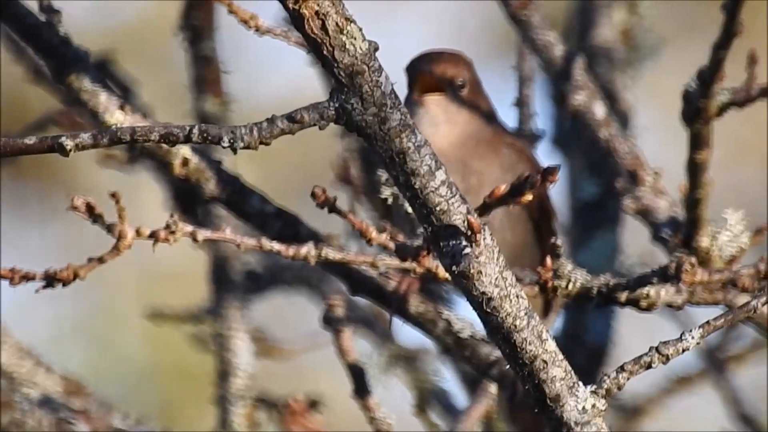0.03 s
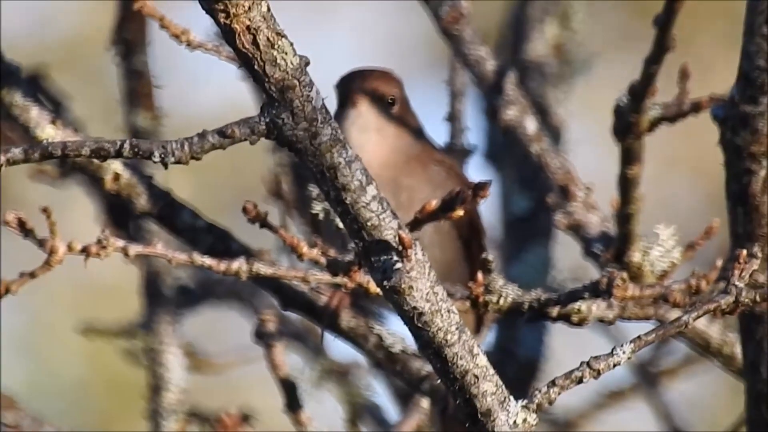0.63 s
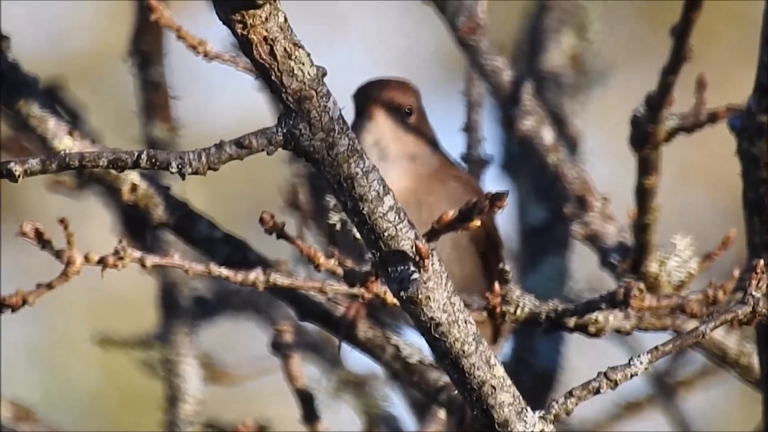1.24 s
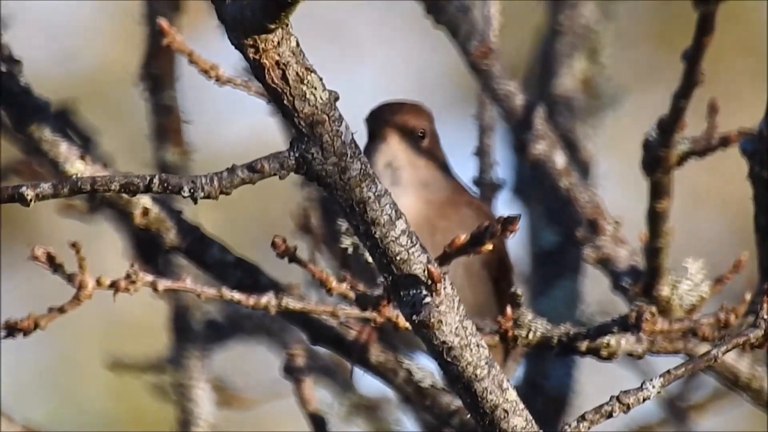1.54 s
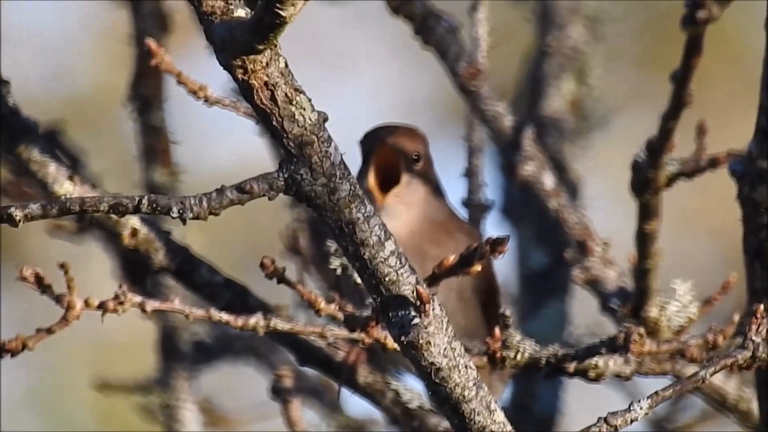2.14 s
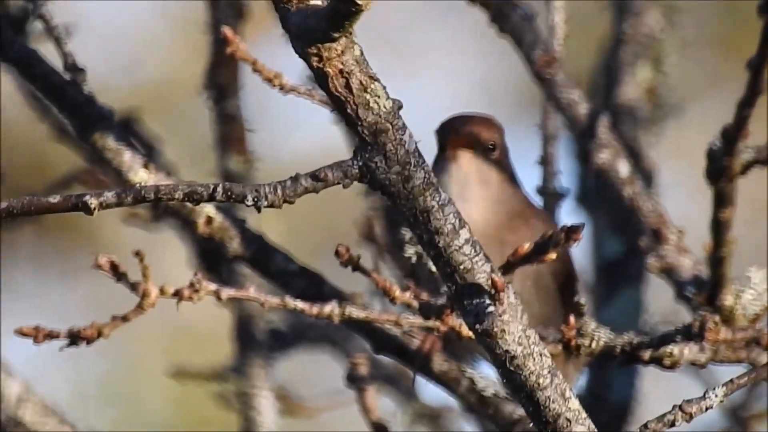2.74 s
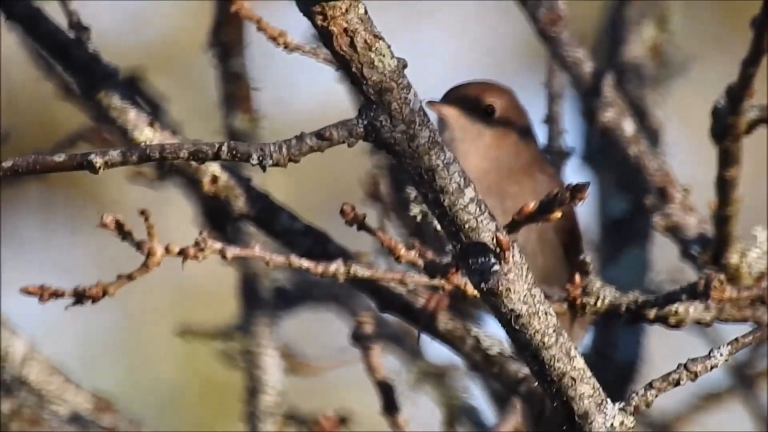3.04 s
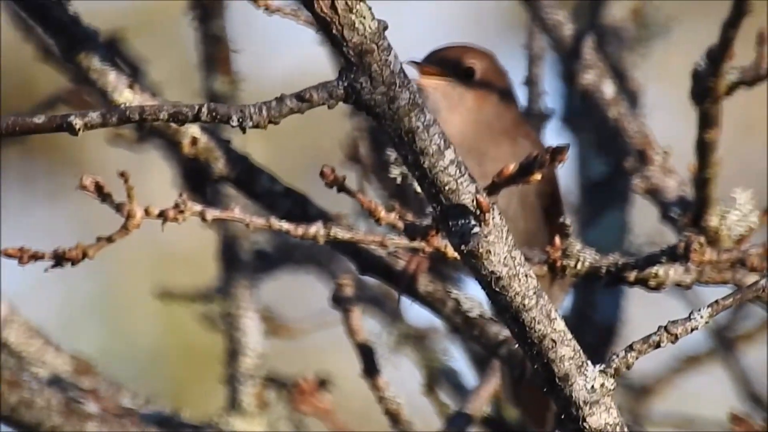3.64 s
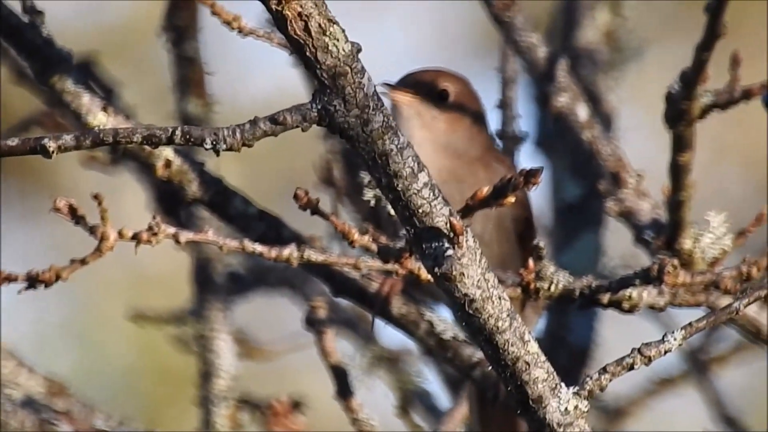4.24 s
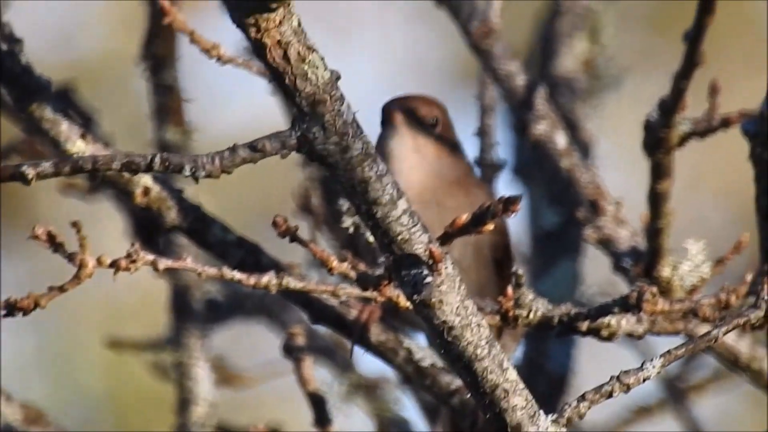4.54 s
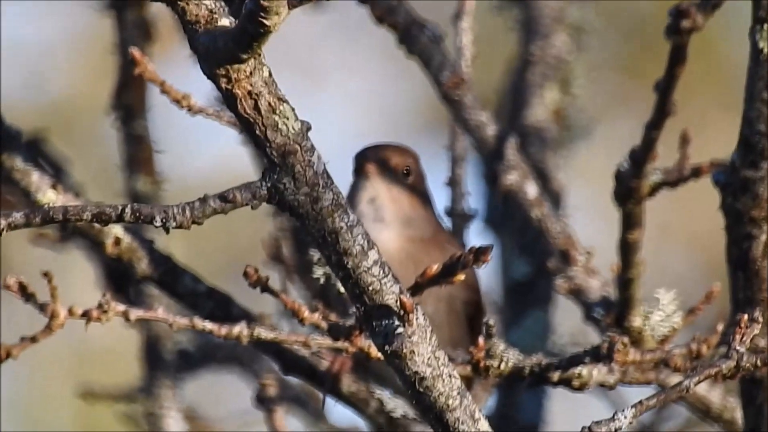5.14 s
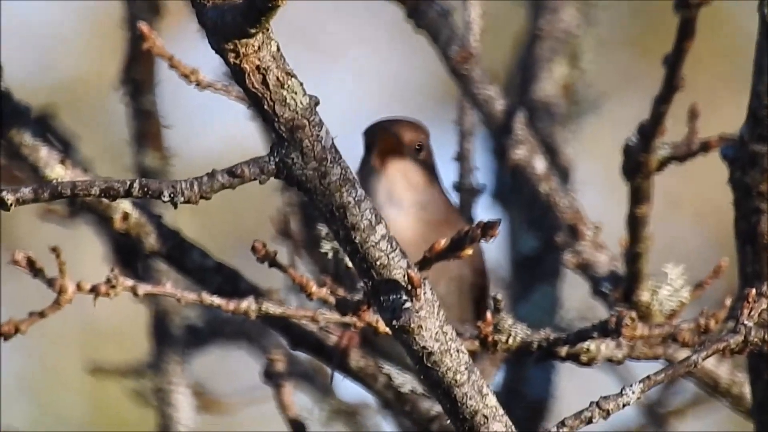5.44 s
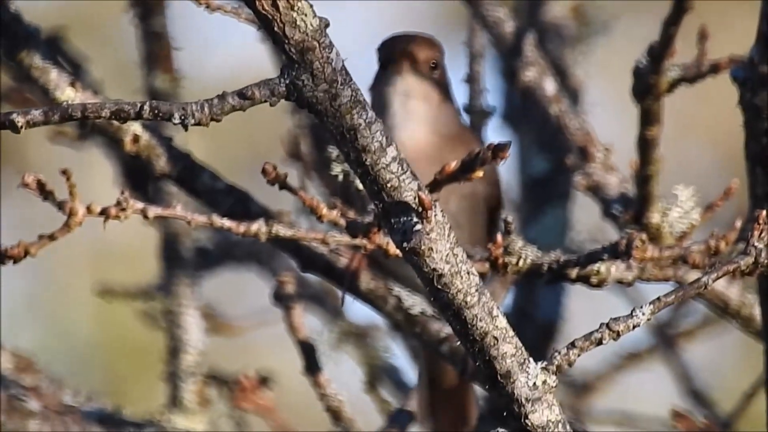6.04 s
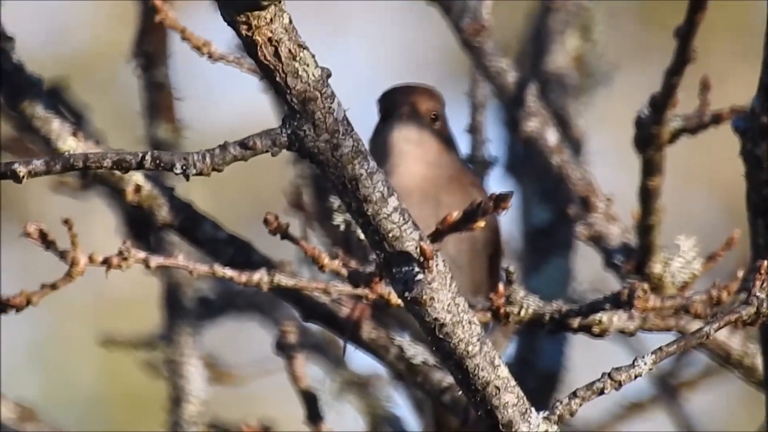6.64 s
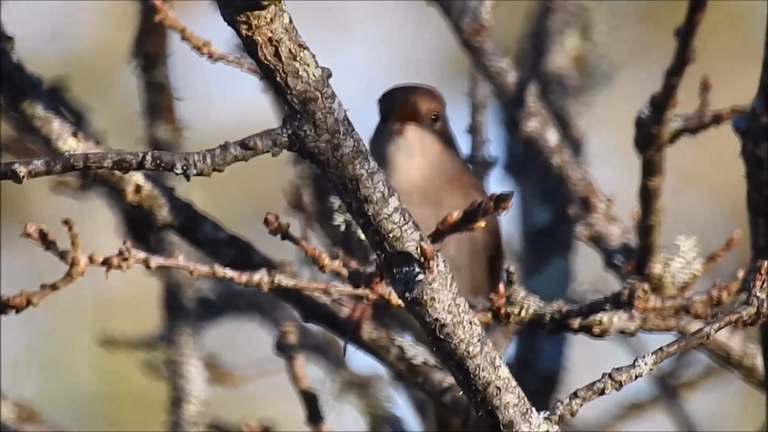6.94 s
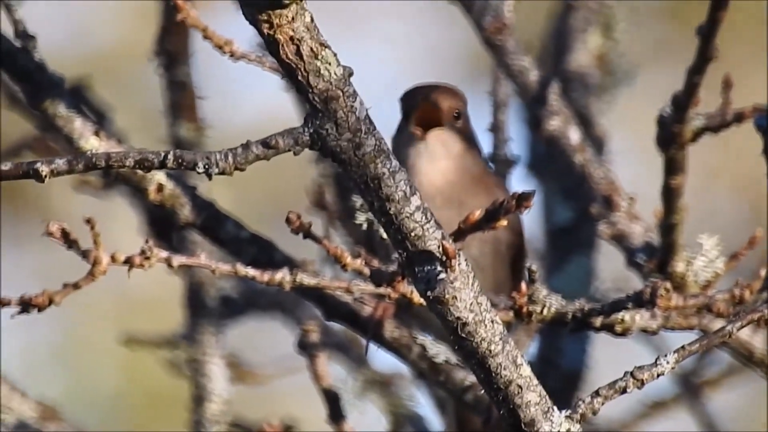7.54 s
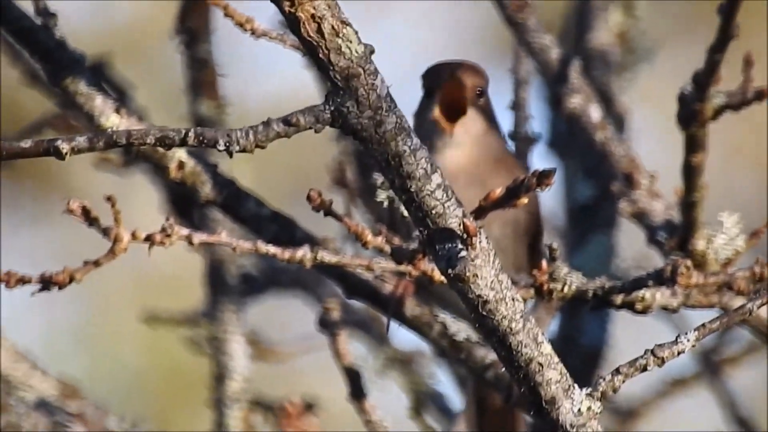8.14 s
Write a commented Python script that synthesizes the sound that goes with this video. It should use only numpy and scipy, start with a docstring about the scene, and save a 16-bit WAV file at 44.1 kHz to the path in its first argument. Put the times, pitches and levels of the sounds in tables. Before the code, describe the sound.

A nightingale sings close by in a bare tree. A few quick slurred notes lead into a hard, fast rattle. After a lull with one thin, high whistle come clicks, sharp slides and two sets of three loud falling notes. Another bird adds buzzy trills, while distant birds chirp over a soft, low hush. The song sits just right of centre, with a light woodland echo.

```python
"""A nightingale sings from a bare tree: thin whistles, slurs, a hard rattle, clicks and falling notes. Its
voice box, the syrinx, makes each note as a nearly pure tone that slides to a turning point; then pitch and
loudness relax together. Some runs of repeated notes slow down as they go. Branches and trunks scatter the song.
Another bird buzzes close by; others whistle farther off, and something hoots, over a brief rustle and a soft
outdoor hush."""
import sys
import numpy as np
from scipy import signal
from scipy.fft import rfft, irfft, next_fast_len
from scipy.io import wavfile
from scipy.ndimage import uniform_filter1d

SR = 44100
rng = np.random.default_rng(int(sys.argv[2]) if len(sys.argv) > 2 else 0)


def wrap_up_sound(samples):
    """Save the sound to the file named by the first command line argument, as 16-bit audio."""
    columns = np.atleast_2d(samples).T
    # keep every value between -1 and 1, then stretch to whole-number steps
    tamed = np.clip(columns, -1, 1)
    steps = np.round(tamed * 32767).astype(np.int16)
    wavfile.write(sys.argv[1], SR, steps)


N = 365588
CUTOFF_HZ = 15500   # the top of the treble

# The nightingale's single notes: (time [s], note name, level [dB], optional pitch and length factors)
SINGLE_NOTES = [ (.771, "flick", -17), (1.594, "zip", -12.5, 1, .8), (1.6025, "tiu", -14.5),
                (4.965, "arch", -14.5), (5.427, "zigzag", -7.5), (5.56, "rise", -13.5),
                (5.609, "drop", -17), (5.985, "warble", -22.5), (6.499, "wheet", -7), (7.428, "lift", -21),
                (7.482, "chow", -13.5), (7.618, "zip", -14, 1.08, 1.2), (7.631, "squeal", -21),
                (7.803, "hook", -20), ]


def nightingale():
    """The whole song. The syrinx has two sides, so a second voice can lead into a note."""
    notes = SINGLE_NOTES + runs()
    out = sing(notes) + rattle() + clicks() + whistles()
    arch = np.hanning(int(.04 * SR))
    for s, name, db, *_ in notes:
        if name == "wheet":
            scrape = rasp(count=2, gap_s=.008, stretch=1.25, fade_db=7, hiss_db=-15)
            thin_rise = arch * syrinx(np.geomspace(7500, 8500, len(arch)), db - 20, rough=.01)
            add(out, s - .0205, from_db(db - 1) * scrape)
            add(out, s - .012, thin_rise)
        if name in ("pew", "tiu"):
            add(out, s - .008, from_db(db - 28) * squeak())
    return out


def syrinx(hz, db, rough, beak_hz=6900):
    """A bird's voice: a slightly shaky tone. The beak muffles its overtones; rough notes hiss more."""
    size = len(hz)
    noise = band(uniform_filter1d(rng.standard_normal(size), size=2), beak_hz / 2, CUTOFF_HZ)
    breath = from_db(35) * (rough * hz / beak_hz) ** 2 * noise
    hz = hz * (1 + rough * drift(size, 1504))
    phase = 2 * np.pi * np.cumsum(hz) / SR
    overtones = sum(np.sin(k * phase) / (k - 1) ** 2 / (1 + (k * hz / beak_hz) ** 4)
                    * (k * hz < CUTOFF_HZ) for k in (2, 3))
    brightness = from_db(-26.5) + rough / 2
    t = np.arange(size) / SR
    soft_ends = np.minimum(1, np.minimum(t, t[::-1]) / .00095)
    return from_db(db) * soft_ends * (np.sin(phase) + brightness * overtones + breath)


# How each kind of note slides, before it is retuned or stretched. Name: (length [ms], turn time [ms],
# start pitch [Hz], turn pitch [Hz], resting pitch [Hz], time to relax [ms], fade-in [ms], fade [dB])
NOTE_SHAPES = { "flick": (39.7, 30, 4130, 8000, 1300, 7.6, 23.7, 40),
               "slur": (35, 7, 4500, 4810, 3830, 18, 9.4, 16),
               "tick": (28.8, 22, 1300, 3000, 1960, 6, 26.4, 9.6),
               "tiu": (71, 19, 4800, 2520, 3250, 45, 1.4, 8.5),
               "low": (43.5, 5.8, 2750, 2450, 1920, 19.2, 4.2, 12.7),
               "swell": (11.5, 3.1, 4050, 4350, 5050, 5.4, 2.6, 6.5),
               "pip": (16, 10.2, 1600, 3100, 2200, 3.2, 10, 17),
               "zip": (10.9, 3.99, 4100, 5100, 7950, 6.6, 3.6, 13),
               "arch": (86, 29.6, 3010, 4720, 3450, 18, 37, 9.3),
               "zigzag": (68, 14, 5600, 5470, 5900, 42, 3, 15),
               "rise": (49.5, 15.5, 1843, 2483, 3498, 26.5, 22, -1),
               "drop": (7.63, 2, 3700, 3470, 1450, 4.65, 1.7, 20.7),
               "warble": (75, 50, 1650, 2020, 2100, 16.3, 36, 20),
               "chew": (32, 6.5, 4750, 4500, 2450, 9, 3.5, 10.8),
               "chow": (26.3, 9, 4450, 3150, 1485, 11.4, 7, 27.8),
               "wheet": (26.6, 14, 4350, 5950, 6750, 8.3, 5.2, 10),
               "lift": (42, 9.1, 3000, 3500, 4100, 21, 4.6, 11),
               "squeal": (106, 62, 7480, 5920, 5500, 38, 7.3, 5),
               "hook": (61.3, 44, 1400, 2450, 1200, 7.4, 47, 33),
               "pew": (40, 4.6, 8300, 6200, 2760, 6, 4.2, 17.3),
               "chip": (76, 13, 6300, 4060, 4200, 55.4, 14, 9),
               "pipe": (117, 35.3, 3300, 3440, 3520, 47, 10, 5), }
# Notes whose pitch swings quickly up and down.
# Name: (swings [per s], full swing [share of pitch], drop at each low point [dB], extra roughness [0-1])
PITCH_SWINGS = {"zigzag": (69.5, 0.67, 25, 0.02), "warble": (135, 0.26, 5.9, .005),
                "squeal": (170, .13, 18, .005), "chip": (200, 0.075, 5, 0.012)}


def note(name, pitch=1, stretch=1, rough=.0054, beak_top_hz=7120):
    """One note: the pitch slides to a turn, then relaxes and takes the loudness with it."""
    length, turn, start_hz, turn_hz, rest_hz, relax, fade_in, fade_db = NOTE_SHAPES[name]
    swing_rate, depth, drop_db, extra_rough = PITCH_SWINGS.get(name, (0, 0, 0, 0))
    t = np.arange(int(length * stretch * SR / 1000)) / SR
    ms = 1000 * t / stretch   # position within the unstretched shape
    slide_hz = start_hz * (turn_hz / start_hz) ** np.minimum(ms / turn, 1)
    relaxed = 1 - np.exp(-(np.maximum(ms - turn, 0) / relax) ** 1.363)
    swing = .5 * np.cos(2 * np.pi * swing_rate * t)
    hz = pitch * (slide_hz + (rest_hz - turn_hz) * relaxed) * (1 + depth * swing)
    db = -fade_db * relaxed ** 2.02 - drop_db * (.5 - swing) ** 2
    opening = np.minimum(ms / fade_in, 1) ** 1.14
    closing = np.minimum((length - ms) / (.099 * length), 1)
    beak = 1 / (1 + (hz / beak_top_hz) ** 20.4)   # very high notes come out weaker
    return opening * closing * beak * syrinx(hz, db, rough + extra_rough)


def sing(rows):
    """Place each note of a list at its own time and level."""
    out = np.zeros(N)
    for s, name, db, *pitch_and_stretch in rows:
        add(out, s, from_db(db) * note(name, *pitch_and_stretch))
    return out


# The nightingale's runs of one note: (start [s], count, first gap [s], gap factor per note, note name,
# first level [dB], level step [dB], first pitch factor, pitch factor step)
NOTE_RUNS = [ (1.162, 3, 0.037, 1.08, "slur", -26.5, 7, 0.92, 0.054),
             (1.3958, 3, .049, 1.1, "pip", -22, -0.5, 1, 0.0025),
             (1.74, 2, 0.049, 1, "low", -32, 15.5, .77, 0.24), (6.1122, 3, .1225, 1, "chew", -6, 0, 1, 0),
             (6.1542, 3, .1225, 1, "chow", -11, 0, 1, 0), (7.9512, 3, .118, 1.042, "pew", -8, .8, 1, 0), ]


def runs():
    """List the notes of each run; gap, level and pitch can move one step with every note."""
    notes = []
    for start, count, gap, slowing, name, db, step_db, pitch, pitch_step in NOTE_RUNS:
        for k in range(round(count)):
            s = start + gap * sum(slowing ** j for j in range(k))
            notes.append((s, name, db + step_db * k, pitch + pitch_step * k))
    return notes


def rattle(start_s=1.8928, count=12, gap_s=.08494, first_db=-10.5, last_db=-9):
    """Hard strokes that grow louder: each is a rasp and a faint upward slide, a clear note, a drop."""
    out = np.zeros(N)
    gaps = gap_s + .0019 * np.linspace(-1, 1, count - 1) ** 2   # a little slower at both ends
    times = start_s + np.r_[0, np.cumsum(gaps)]
    for s, db in zip(times, np.linspace(first_db, last_db, count)):
        clear_pitch, drop_pitch = 1 + rng.normal(0, .012, size=2)
        add(out, s, from_db(db - .1) * rasp(count=4, gap_s=.0044, stretch=.97, fade_db=1.1, hiss_db=-13))
        add(out, s, from_db(db - 19) * note("tick", pitch=1.27, rough=.026))
        add(out, s + .0215, from_db(db) * note("swell", clear_pitch, rough=.019))
        add(out, s + .032, from_db(db - 2) * note("drop", 1.39 * drop_pitch, stretch=1.15, rough=.026))
    return out


def rasp(count, gap_s, stretch, fade_db, hiss_db, rough=.03, uneven=.15):
    """One side of the syrinx fires quick, uneven upward slides that get lower and louder, with hiss."""
    out = np.zeros(SR // 10)
    for k, (late, sharp, strong) in enumerate(rng.standard_normal((count, 3))):
        to_come = count - 1 - k
        slide = note("zip", 1 + .0692 * to_come + rough * sharp, stretch, rough)
        strength = from_db(-fade_db * to_come ** 2) * (1 + uneven * strong)
        add(out, (k + uneven * late) * gap_s, strength * slide)
    add(out, 0, from_db(hiss_db) * puff((count + 1) * gap_s, low_hz=4900, high_hz=6950, order=2))
    return out


# The nightingale's bursts of clicks: (time [s], level [dB])
CLICK_BURSTS = [(4.403, -35.5), (5.681, -20.5), (5.73, -18), (5.784, -15.5), (5.833, -16), (5.887, -16)]


def clicks(gap_s=.0061, fade_db=2):
    """Bursts of four dry, noisy clicks, each weaker than the last."""
    out = np.zeros(N)
    for s, db in CLICK_BURSTS:
        for k in range(4):
            click = puff(length_s=.0029, low_hz=6000, high_hz=6900)
            add(out, s + k * gap_s, from_db(db - fade_db * k) * click)
    return band(out + 1e-18, low_hz=2600, high_hz=6700)


def puff(length_s, low_hz, high_hz, order=1):
    """A burst of hiss that swells and dies."""
    arch = np.hanning(int(length_s * SR))
    return arch * rms_one(band(rng.standard_normal(len(arch)), low_hz, high_hz, order))


# The nightingale's long, thin whistles: (time [s], level [dB])
THIN_WHISTLES = [(-.335, -37.5), (3.69, -38.5)]


def whistles(length_s=.576, held_hz=7540, settle_s=.039, droop_s=.0066, swell_db=9, soft_db=25):
    """Each whistle slides down to a high, held pitch, swells, and droops as it stops."""
    out = np.zeros(N)
    t = np.arange(0, length_s, 1 / SR)
    arriving, leaving = np.exp(-t / settle_s), np.exp((t - length_s) / droop_s)
    hz = held_hz + 1600 * arriving - 500 * leaving
    shape_db = swell_db * (t / length_s - 1) - soft_db * (arriving + leaving)
    for s, db in THIN_WHISTLES:
        add(out, s, syrinx(hz, db + shape_db, rough=.0063))
    return out


def squeak(length_s=.018, top_hz=13600, plunge_hz=5500, plunge_s=.0024):
    """A very high, thin voice that swells, then plunges into the main note."""
    t = np.arange(0, length_s, 1 / SR)
    hz = top_hz - plunge_hz * np.exp((t - length_s) / plunge_s)
    swell = np.sin(np.pi * (t / length_s) ** 2)
    return swell * syrinx(hz, db=0, rough=.007)


# A nearby bird's strings of buzzy notes:
# (middle of first note [s], count, fast gap [s], slow gap [s], first level [dB], last level [dB])
BUZZY_TRILLS = [(1.494, 9, 0.0445, .049, -29, -28.5), (6.634, 14, .0428, .083, -29.5, -24.5)]


def buzzing_bird(flutter_hz=340, slows_at_note=7.8, slows_over_notes=.76):
    """Arched, fluttering notes. As the pace slows they last longer, sit higher and swing wider."""
    out = np.zeros(N)
    for start, count, fast_gap, slow_gap, first_db, last_db in BUZZY_TRILLS:
        count = round(count)
        slowed = 1 / (1 + np.exp((slows_at_note - np.arange(count - 1)) / slows_over_notes))
        middles = np.r_[0, np.cumsum(fast_gap + (slow_gap - fast_gap) * slowed)]
        lengths = .6 * np.gradient(middles)   # a note fills 60% of its turn
        for s, length, db in zip(start + middles, lengths, np.linspace(first_db, last_db, count)):
            t = np.arange(0, length, 1 / SR)
            edge = np.linspace(-1, 1, len(t)) ** 2   # both ends are lower and softer
            flutter = np.sin(2 * np.pi * flutter_hz * t)
            hz = (3600 + 38000 * length) * (1 - .17 * edge + 3.3 * length * flutter)
            add(out, s - length / 2, syrinx(hz, db - 13 * edge - 3 * (1 + flutter), rough=.017))
    return out


# Calls from other trees: (time [s], note name, level [dB], pitch factor, length factor)
FAR_CALLS = [ (.11, "swell", -46, .73, 9), (.505, "chow", -41, .85, 1.1), (.672, "pip", -39, 1.05, 1.1),
             (4.632, "low", -36, 0.82, 0.55), (4.79, "warble", -33.5, 1.48, 0.9),
             (5.725, "pipe", -38, 1.07, 0.92), (5.897, "slur", -32, 0.73, 1.8),
             (6.06, "pipe", -33, 0.845, 0.75), (6.575, "slur", -29.5, 0.83, 1.7),
             (6.775, "slur", -34, .69, 1.4), (6.857, "pipe", -37, .585, .5), (6.99, "slur", -31, .615, 2.7),
             (7.188, "slur", -35, .78, 2), (7.263, "lift", -31, .9, .8), (7.36, "swell", -32, .6, 13), ]
# Calls said over and over: (start [s], end [s], gap [s], note name, level [dB], pitch and length factors)
FAR_REPEATS = [ (.005, 1.1, .207, "low", -44, .88, 0.82), (3.054, 4.3, 0.5, "pipe", -41.5, 1.005, 1),
               (3.276, 4, 0.503, "chip", -31, 0.98, 1), (5.169, 5.35, 0.0272, "chow", -36, 0.62, 0.33),
               (4.258, 4.65, .101, "tick", -41.5, 1.04, 1.94), (7.096, 7.16, .026, "zip", -27, 1.05, .5), ]


def far_birds():
    """Distant birds sing single notes or repeat one note at a steady pace."""
    repeated = [(s, *call) for start, end, gap, *call in FAR_REPEATS for s in np.arange(start, end, gap)]
    return sing(FAR_CALLS) + sing(repeated)


# Something hooting far off: (time [s], level [dB])
FAR_HOOTS = [(.055, -37), (.825, -38)]


def hoots(pitch_hz=560, length_s=.08):
    """Short, hoarse tones that swell and fade."""
    out, arch = np.zeros(N), np.hanning(int(length_s * SR))
    for s, db in FAR_HOOTS:
        add(out, s, syrinx(np.full(len(arch), pitch_hz), db - 8 * (1 - arch), rough=.09))
    return out


def chorus(count=170, level_db=-48, lowest=.62, highest=1.7):
    """Faint chirps from all over the wood, at random times and pitches."""
    shapes = ["low", "tick", "hook", "lift", "warble"]
    return sing([(when * N / SR, shapes[k % len(shapes)], level_db, lowest * (highest / lowest) ** height)
                 for k, (when, height) in enumerate(rng.random((count, 2)))])


def tree_echo(sound, twigs_db, trunks_db, trunks_s, twigs_s=.17, low_hz=1200, high_hz=7100):
    """Branches scatter sound quickly and trunks answer for longer, differently for each ear."""
    t = np.arange(int(.8 * SR)) / SR
    onset = np.clip((t - .002) / .0022, 0, 1)
    echo = 0
    for db, fade_s in [(twigs_db, twigs_s), (trunks_db, trunks_s)]:
        bounces = rng.standard_normal((3, len(t))) * from_db(5.7 * rng.standard_normal((3, len(t))))
        both_ears = bounces[:2] + 1.04 * bounces[2]   # each ear's own bounces plus shared ones
        tail = both_ears * from_db(-60 * t / fade_s) * onset
        echo = echo + from_db(db) * tail / np.sqrt(np.sum(tail ** 2) / 2)
    echo = band(echo, low_hz, high_hz, order=3) + from_db(-15.5) * band(echo, high_hz, CUTOFF_HZ)
    return signal.fftconvolve(sound[None], echo, axes=1)[:, :N]


def rustle(level_db=-56, fades_at_s=1.0, fade_s=.16):
    """A soft, low rustle that dies away early on."""
    fading = 1 / (1 + np.exp((np.arange(N) / SR - fades_at_s) / fade_s))
    return from_db(level_db) * fading * rms_one(band(rng.standard_normal(N), low_hz=480, high_hz=1250))


# How strong the background hush is, from bass to treble: (frequency [Hz], relative level [dB])
HUSH_TONE = [(40, -12), (82, 2.5), (145, -9.5), (200, -2.5), (263, -7.5), (643, -5), (765, -10.5),
             (1200, -8.5), (1390, -16.5), (3560, -15.5), (6140, -20), (15000, -38.5)]


def hush(level_db=-50.9, width_db=-12):
    """Distant air and traffic: a deep, steady noise, nearly alike in both ears."""
    hz, db = np.transpose(HUSH_TONE)
    size = next_fast_len(N)
    all_hz = np.maximum(np.fft.rfftfreq(size, 1 / SR), 1)
    tone = from_db(np.interp(np.log(all_hz), np.log(hz), db))
    bass_cut = np.minimum(1, all_hz / hz[0]) ** 4
    noise = irfft(rfft(rng.standard_normal((2, size))) * tone * bass_cut, size)
    middle, sides = rms_one(noise[:, :N])
    return from_db(level_db) * (middle + from_db(width_db) * sides * [[1], [-1]])


def direct_sound(sound, dip_hz=3900, dip_share=.75, lag_samples=.38):
    """The sound straight from the bird, just right of centre. Notes weaken as they slide past dip_hz."""
    notched = signal.lfilter(*signal.iirnotch(dip_hz, Q=7, fs=SR), sound + 1e-18)
    right = sound + dip_share * (notched - sound)
    delay = (1 - lag_samples) / (1 + lag_samples)
    left = signal.lfilter([delay, 1], [1, delay], right)   # reaches the left ear a little later
    return np.array([left, right]) * from_db([[-.45], [.45]])


def from_db(db):
    """Turn decibels into a number to multiply by."""
    return 10 ** (np.asarray(db) / 20)


def rms_one(x):
    """Scale a sound to an average power of one."""
    return x / np.sqrt(np.mean(x ** 2) + 1e-20)


def add(track, s, sound):
    """Mix a sound in at s seconds; what lies outside the track is dropped."""
    at = round(s * SR)
    first, last = max(at, 0), min(at + len(sound), len(track))
    track[first:last] += sound[first - at:last - at]


def band(x, low_hz, high_hz, order=2):
    """Keep what lies between two frequencies; a higher order cuts more sharply."""
    edges = [low_hz, min(high_hz, .45 * SR)]
    return signal.sosfilt(signal.butter(order, edges, "band", fs=SR, output="sos"), x)


def drift(size, rate):
    """A random wander that heads for a new value rate times a second."""
    turns = rng.standard_normal(size=2048)
    return np.interp(np.arange(size) * rate / SR, np.arange(len(turns)), turns)


def scene(waver_db=2.6, waver_rate=70):
    """Near birds are clear; far ones waver in loudness and carry more echo; the chorus is echo alone."""
    near = nightingale() + buzzing_bird()
    far = (far_birds() + rustle()) * from_db(waver_db * drift(N, waver_rate)) + hoots()
    near_echo = tree_echo(near, twigs_db=-7.8, trunks_db=-16, trunks_s=.76)
    far_echo = tree_echo(far + chorus(), twigs_db=-5, trunks_db=-6.5, trunks_s=1.0)
    return direct_sound(near) + near_echo + from_db(-2.5) * far + far_echo + hush()


def record(dry):
    """Cut the very highest treble off steeply."""
    return signal.sosfilt(signal.ellip(10, .1, 90, CUTOFF_HZ, fs=SR, output="sos"), dry)


dry = scene()
out = record(dry)
wrap_up_sound(out)
```